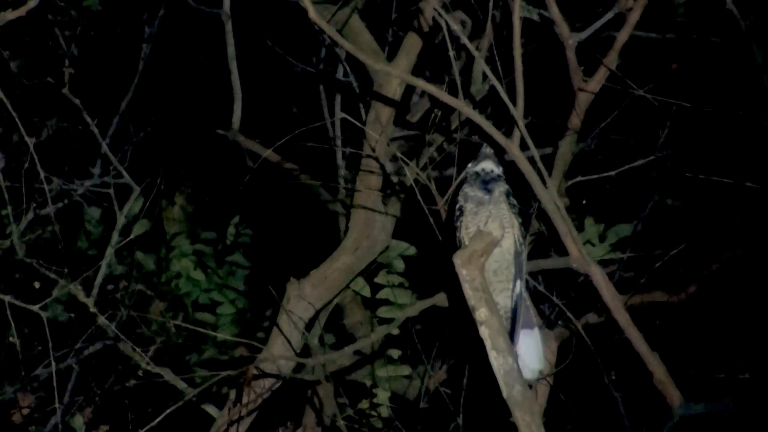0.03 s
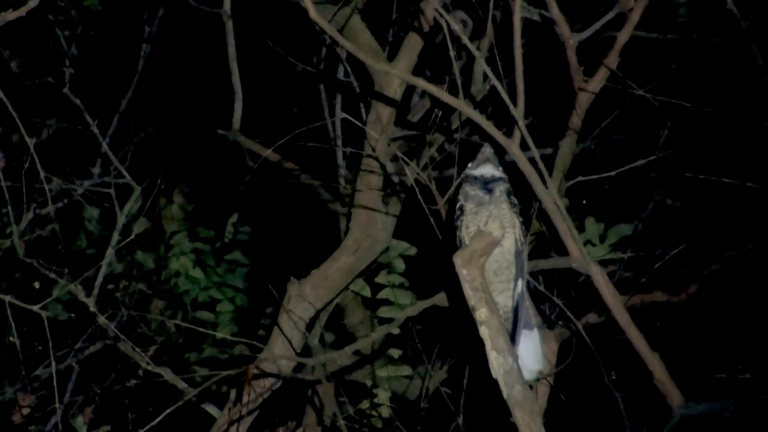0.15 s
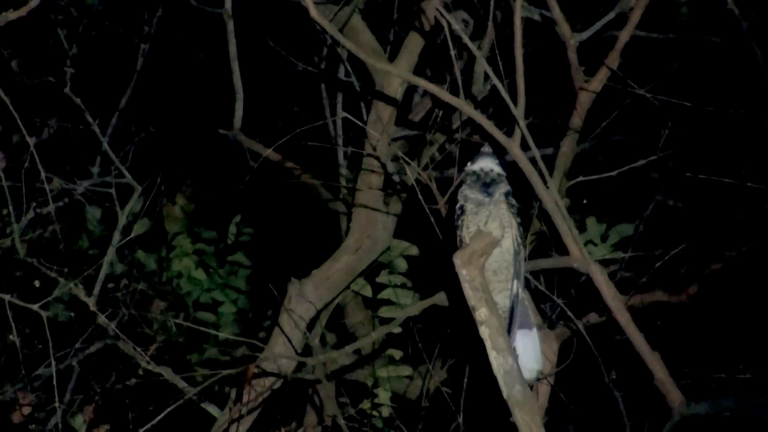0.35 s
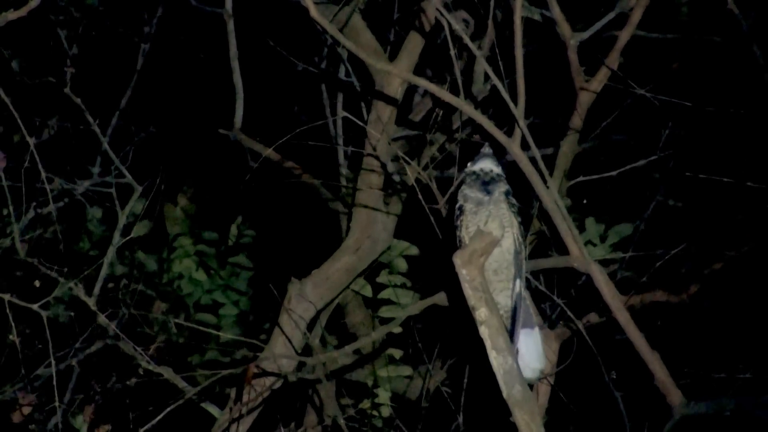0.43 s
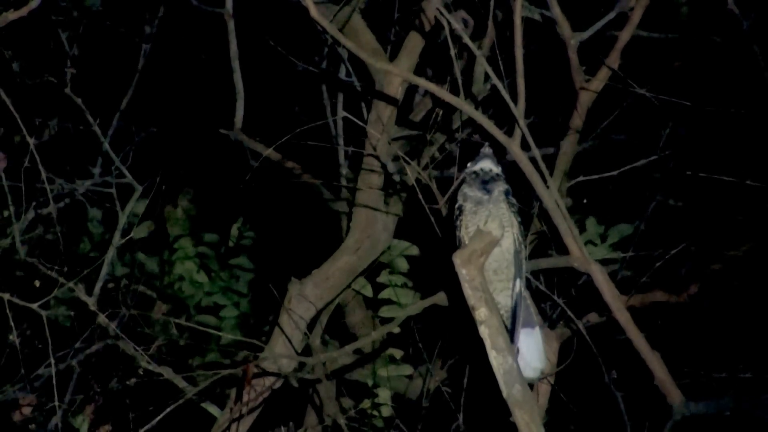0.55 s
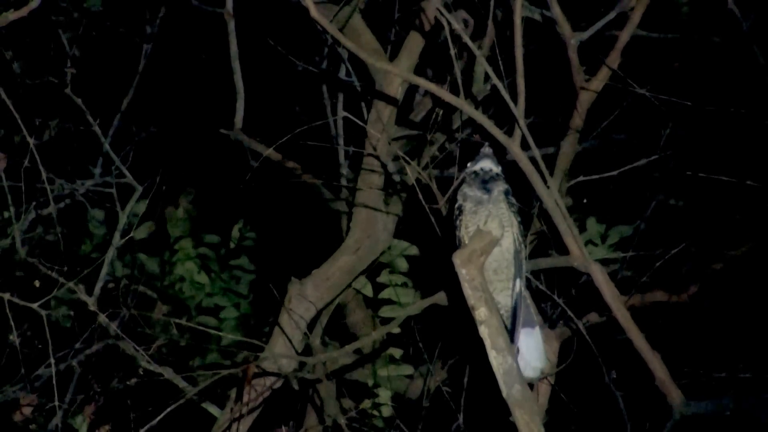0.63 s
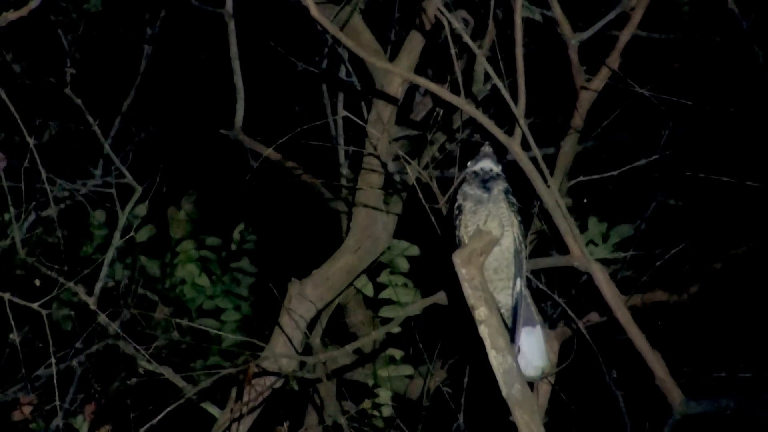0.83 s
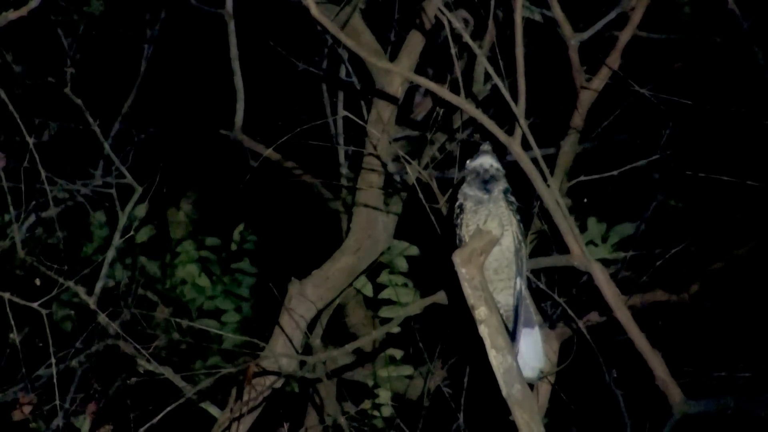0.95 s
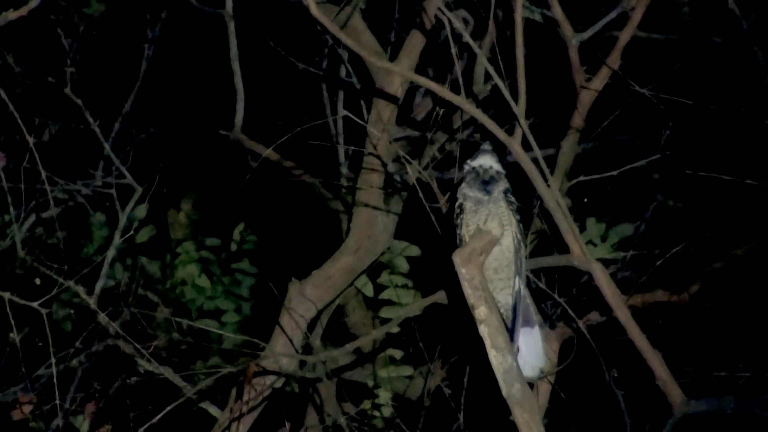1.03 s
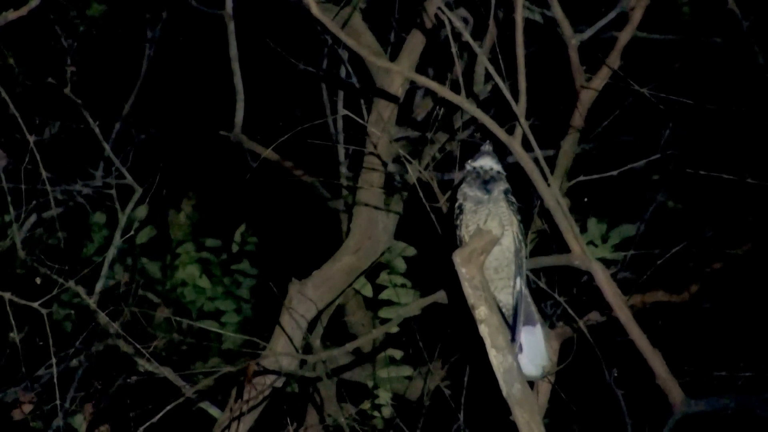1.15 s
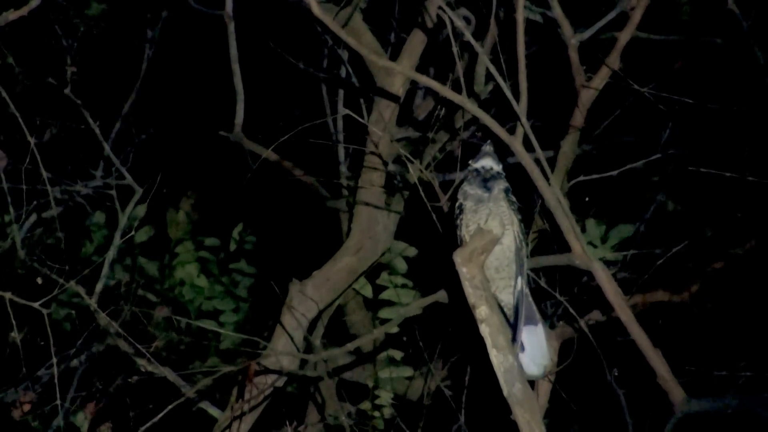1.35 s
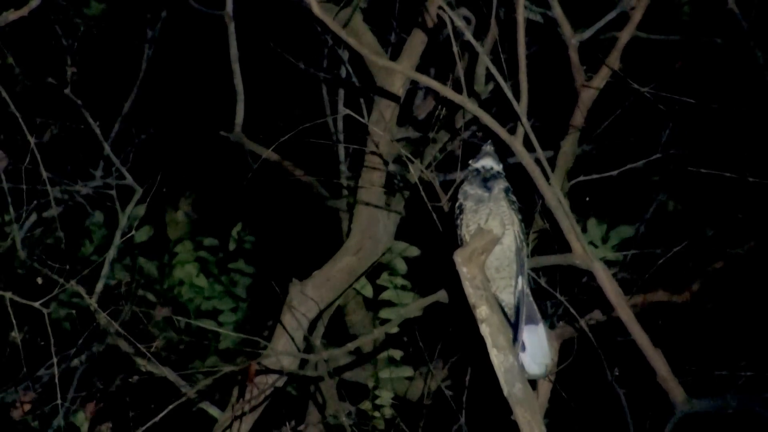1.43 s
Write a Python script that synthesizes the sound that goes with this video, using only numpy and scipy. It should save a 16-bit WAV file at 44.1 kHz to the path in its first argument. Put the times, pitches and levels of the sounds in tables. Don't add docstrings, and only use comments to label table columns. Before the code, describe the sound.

A nightjar gives two short hollow knocking calls in quiet night woods over faint insect hiss

```python
import sys
import numpy as np
from scipy import signal
from scipy.fft import rfft, irfft
from scipy.io import wavfile
from scipy.ndimage import uniform_filter1d

SR = 44100
rng = np.random.default_rng(int(sys.argv[2]) if len(sys.argv) > 2 else 0)


def volts_from_db(level):
    exponent = np.asarray(level, float) / 20
    return 10 ** exponent


def wav_out(sig):
    wavfile.write(sys.argv[1], SR, np.round(np.clip(np.atleast_2d(sig).T, -1, 1) * 32767).astype(np.int16))


N = 66150

# frequency in Hz, side against mid in dB.
SIDE_WIDTH = [(60, -33), (200, -39), (380, -21), (700, -9.5), (1290, -1.5), (4400, -2), (9000, -4.5),
              (12000, -33)]


def table(points, hz):
    p = np.array(points, float)
    return np.interp(np.log(np.maximum(hz, 1)), np.log(p[:, 0]), p[:, 1])


def unit(x):
    return x / np.sqrt(np.mean(x ** 2))


def walk(rate_hz):
    hold = int(SR / rate_hz)
    steps = np.repeat(rng.standard_normal(N // 500), hold)[:N]
    return 1.5 * uniform_filter1d(uniform_filter1d(steps, hold), hold)


def band(hz, width_hz):
    f = np.fft.rfftfreq(N, 1 / SR)
    bell = 1 / (1 + (2 * (f - hz) / width_hz) ** 4)
    return irfft(rfft(rng.standard_normal((2, N))) * bell, N)


def balance(left_db):
    return volts_from_db(np.array([[left_db], [-left_db]]) / 2)


def spread(pair, side_db, left_db):
    left_right = pair[0] + volts_from_db(side_db) * pair[1] * np.array([[1], [-1]])
    return left_right * balance(left_db)


def delay(x, s):
    return irfft(rfft(x) * np.exp(-2j * np.pi * np.fft.rfftfreq(N, 1 / SR) * s), N)


def blob(peak_s, db, hz, rise_hz_per_s, half_s):
    u = np.clip((np.arange(N) / SR - peak_s) / half_s, -1, 1) * half_s
    env = np.cos(np.pi / 2 * u / half_s) ** 3
    return volts_from_db(db) * env * np.sin(2 * np.pi * (hz * u + rise_hz_per_s * u ** 2 / 2))


def night_air():
    # frequency in Hz, noise density in dB.
    spectrum = [(22, -39), (52, -7.5), (110, -10), (300, -4), (900, -11), (3600, -22), (9300, -33),
                (15500, -43)]
    # frequency in Hz, left against right in dB.
    lean = [(200, 0.2), (380, 2), (1000, 4), (2400, 0.7), (4400, 2.7), (8100, 2.7), (12000, -21)]
    level_db, swell_db, flicker_db = -57, .6, 1.1
    out, swell = 0, walk(2.0)
    for hz in 22 * 2 ** np.arange(0, 9.6, 1 / 3):
        db = table(spectrum, hz) + swell_db * swell + flicker_db * walk(9.18)
        noise = band(hz, hz / 3.56)
        out = out + volts_from_db(db) * spread(noise, table(SIDE_WIDTH, hz), table(lean, hz))
    return volts_from_db(level_db) * unit(out)


def far_engine():
    # frequency in Hz, width in Hz, level in dB.
    hum = [(72.5, 6.4, -71), (139.4, 30, -76.5), (221, 16, -81), (295.3, 11.6, -73), (353.2, 32, -72)]
    out = 0
    for hz, width_hz, db in hum:
        out = out + volts_from_db(db) * spread(unit(band(hz, width_hz)), table(SIDE_WIDTH, hz), 0)
    return out


def insects():
    # frequency in Hz, width in Hz, level in dB, throb in Hz, throb depth 0-1,
    # swell in dB, left against right in dB, side against mid in dB.
    choirs = [
        (6900, 1800, -78, 90, .1, 1.1, .6, -4),
        (2950, 150, -82, 60, .2, 1.5, 1.2, -5),
        (5150, 850, -68.5, 240, .25, 1.7, 2.5, -6),
        (10700, 850, -80, 131, .85, 1.1, -1.2, -10),
    ]
    out = 0
    for hz, width_hz, db, throb_hz, depth, swell_db, left_db, side_db in choirs:
        wing_hz = throb_hz * (1 + .006 * walk(3.86))
        throb = 1 + depth * np.sin(2 * np.pi * np.cumsum(wing_hz) / SR)
        hiss = spread(unit(band(hz, width_hz)), side_db, left_db)
        out = out + volts_from_db(db + swell_db * walk(7.8)) * throb * hiss
    return out


def whistle():
    # start in seconds, level in dB, pitch scale.
    knocks = [
        (.2445, -19, 1.001),
        (0.9994, -19, 1.005),
    ]
    # seconds after start, pitch in Hz, level in dB.
    plunge = [(.0008, 1150, -40), (.0022, 1380, -17), (.0038, 1730, -8), (.0060, 1710, 0),
              (.0124, 1525, -2), (.0142, 1330, -12), (.0200, 1050, -15), (.0290, 850, -12),
              (.0345, 700, -30)]
    # peak in seconds after start, level in dB, pitch in Hz, rise in Hz per s, half length in s.
    side_tones = [
        (0.00216, -21.5, 2564, 300000, 0.0019),
        (.0225, -11, 1308, -15000, 0.0056),
        (.0400, -22.5, 1295, -5000, 0.0094),
        (0.043, -20, 670, -3000, 0.009),
    ]
    # multiple of the pitch, level in dB.
    overtones = [(2, -42.5), (3, -34.5), (4, -36.5), (5, -38), (6, -37), (7, -35), (8, -35.5)]
    # frequency in Hz, gain in dB.
    throat = [(2000, 12), (2700, 8.5), (3400, -3), (4300, 2), (5900, -17.5), (6950, 7.5), (8800, -21.5),
              (10500, 3)]
    throat_top_hz, overtone_power = 12100, 0.29
    overtone_end_s, overtone_fade_s = .018, .004

    t, pure, high = np.arange(N) / SR, np.zeros(N), np.zeros(N)
    at_s, pitch_hz, level_db = np.array(plunge).T
    for s, db, scale in knocks:
        hz = uniform_filter1d(scale * np.interp(t - s, at_s, pitch_hz), size=40)
        env = volts_from_db(np.interp(t - s, at_s, level_db, left=-150, right=-150))
        env = uniform_filter1d(env, size=40).clip(0)
        phase = 2 * np.pi * np.cumsum(hz * (t > s)) / SR
        pure += volts_from_db(db) * env * np.sin(phase)
        for late_s, tone_db, tone_hz, rise_hz_per_s, half_s in side_tones:
            pure += blob(s + late_s, db + tone_db, tone_hz, rise_hz_per_s, half_s)
        fade = np.exp(-(t - s - overtone_end_s).clip(0) / overtone_fade_s)
        high_env = env ** overtone_power * fade
        for k, k_db in overtones:
            gain = volts_from_db(db + k_db + table(throat, k * hz))
            high += gain * high_env * np.sin(k * phase + k * k)
    return pure, signal.sosfilt(signal.butter(14, throat_top_hz, fs=SR, output="sos"), high)


def gulps():
    # peak in seconds, level in dB, pitch at peak in Hz, rise in Hz per s, half length in s.
    swallows = [
        (0.3, -29, 811, 8000, 0.014),
        (0.34, -32.5, 801, 4000, 0.018),
        (.3840, -38, 774, -1000, .022),
        (1.057, -29, 815, 9000, 0.013),
        (1.09, -30, 806, 8100, 0.011),
        (1.1385, -35, 798, 500, 0.018),
        (.3700, -46, 735, 1500, .008),
        (1.1220, -47, 755, 1500, .007),
        (.4270, -48, 800, 2000, .012),
        (1.214, -72, 830, 2000, .01),
    ]
    strong_db, after_s, after_db = -33, .0142, -7.5
    out = np.zeros(N)
    for s, db, hz, rise_hz_per_s, half_s in swallows:
        out += blob(s, db, hz, rise_hz_per_s, half_s)
        if db > strong_db:
            out += blob(s + after_s, db + after_db, 785, 0, .0145)
    return out


def woods(voice, high):
    # delay in seconds, left level in dB, right level in dB.
    trunks = [(.0105, -33, -16.5), (.0170, -11, -36), (.0255, -21, -43), (.0283, -45, -18.5),
              (.0350, -22, -32), (.0410, -23, -22), (.0527, -23.5, -42), (.0590, -21, -17.5),
              (.0657, -37, -25.5), (.0693, -17, -37), (.0870, -26.5, -31), (.0925, -24, -40),
              (.0990, -25, -28), (.1190, -37, -43), (.1320, -41, -35), (.1500, -29, -44), (.1580, -32, -40),
              (0.172, -33, -59), (.1870, -35, -40), (.2020, -38, -39), (0.279, -37, -45)]
    left_db, left_lag_s, overtone_left_db = 2.5, .000042, -2.5
    tail_db, t60_s, tail_top_hz = -12.5, 0.89, 2940
    echo_low_hz, overtone_echo_db = 1000, -12
    direct = np.array([delay(voice, left_lag_s), voice]) * balance(left_db)
    direct += high * balance(overtone_left_db)

    t = np.arange(SR // 2) / SR
    tail = rng.standard_normal((2, len(t))) * volts_from_db(-60 * t / t60_s) * (t > .008)
    room = volts_from_db(tail_db) * tail / np.sqrt(np.sum(tail ** 2, axis=1, keepdims=True))
    room = signal.sosfilt(signal.butter(1, tail_top_hz, fs=SR, output="sos"), room)
    for s, trunk_left_db, trunk_right_db in trunks:
        room[:, int(s * SR)] += volts_from_db(np.array([trunk_left_db, trunk_right_db]))
    room = signal.sosfilt(signal.butter(1, echo_low_hz, "high", fs=SR, output="sos"), room)
    sent = voice + volts_from_db(overtone_echo_db) * high
    return direct + signal.fftconvolve(sent[None], room, axes=1)[:, :N]


def scene():
    background = night_air() + far_engine() + insects()
    pure, high = whistle()
    return background + woods(pure + gulps(), high)


def top_cut(x):
    return signal.sosfilt(signal.butter(12, 15940, fs=SR, output="sos"), x)


def record(dry):
    top_hz, side_top_hz = 15600, 11300
    dry = signal.sosfilt(signal.ellip(8, .2, 60, top_hz, fs=SR, output="sos"), dry)
    mono_top = 1 / (1 + (np.fft.rfftfreq(N, 1 / SR) / side_top_hz) ** 40)
    side = irfft(rfft(dry[0] - dry[1]) * mono_top, N) / 2
    mix = dry.mean(axis=0) + side * np.array([[1], [-1]])
    return top_cut(mix)


dry = scene()
out = record(dry)
wav_out(out)
```